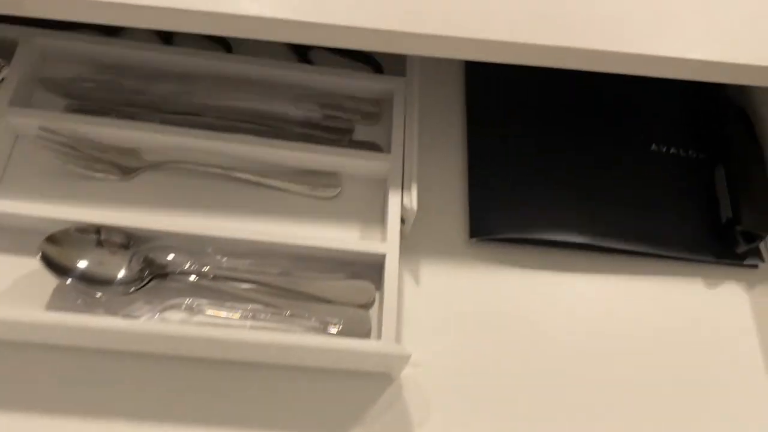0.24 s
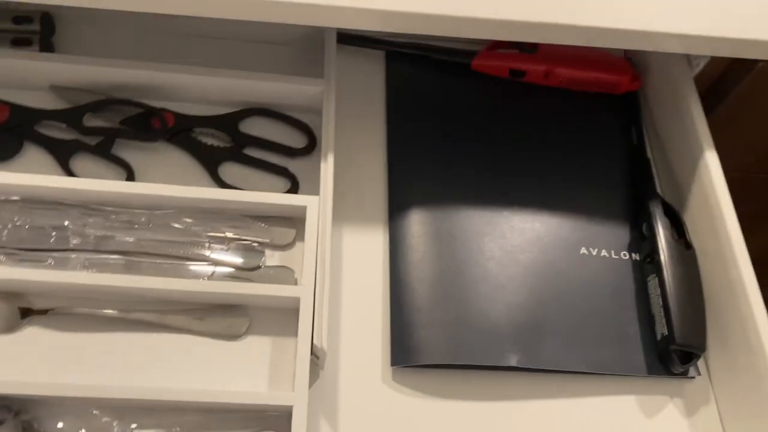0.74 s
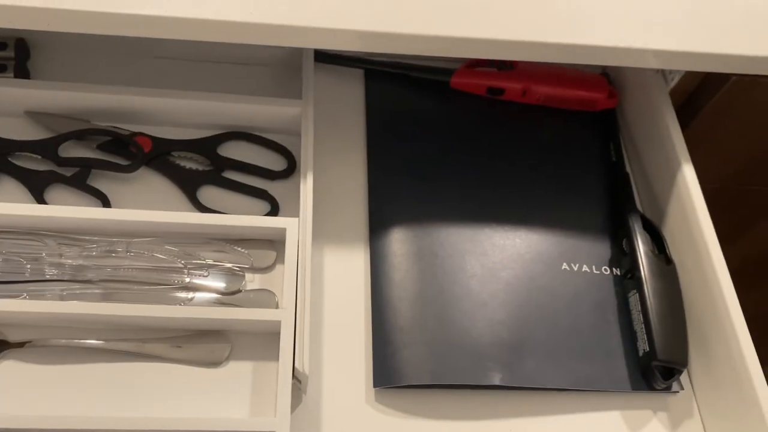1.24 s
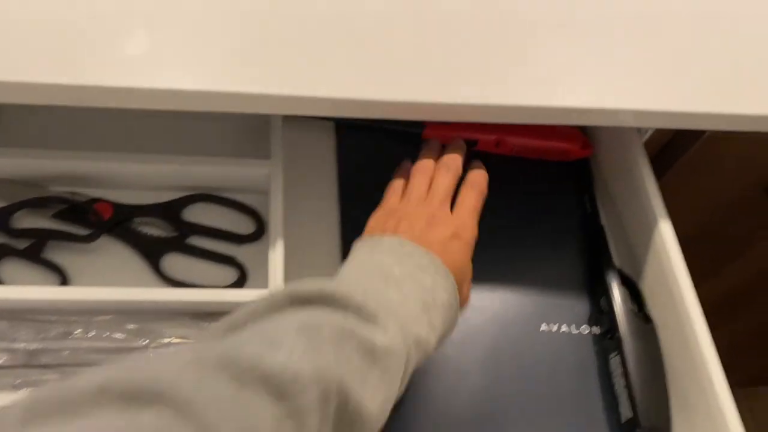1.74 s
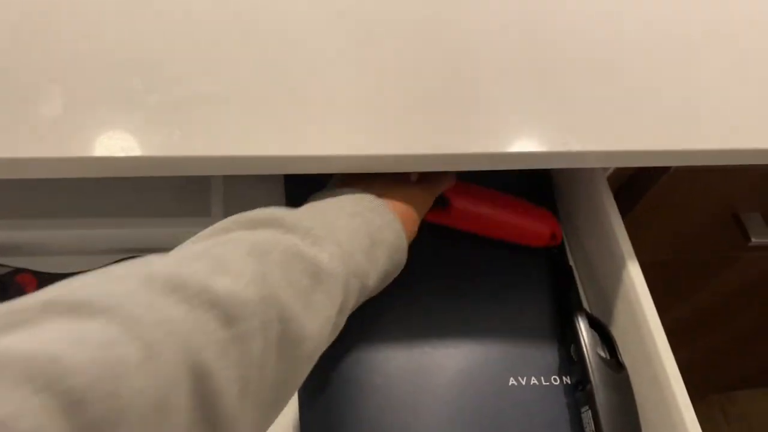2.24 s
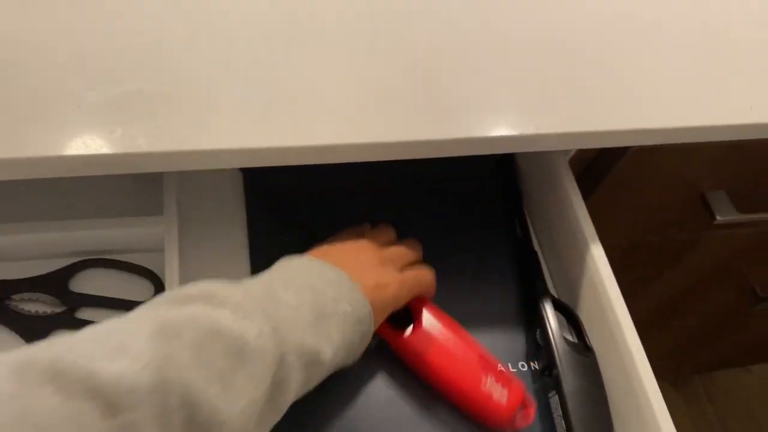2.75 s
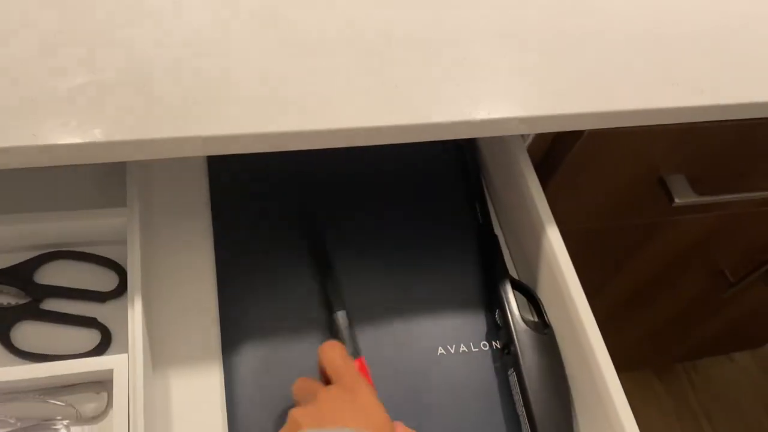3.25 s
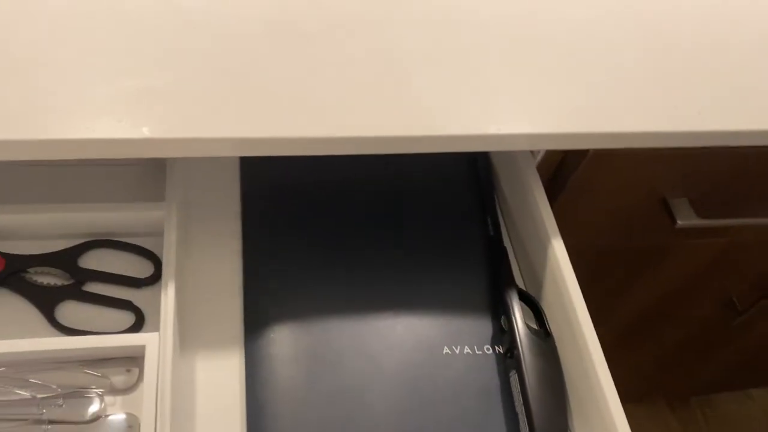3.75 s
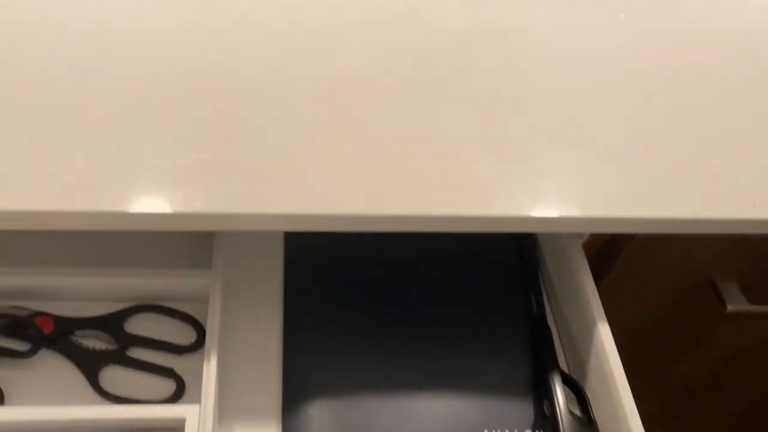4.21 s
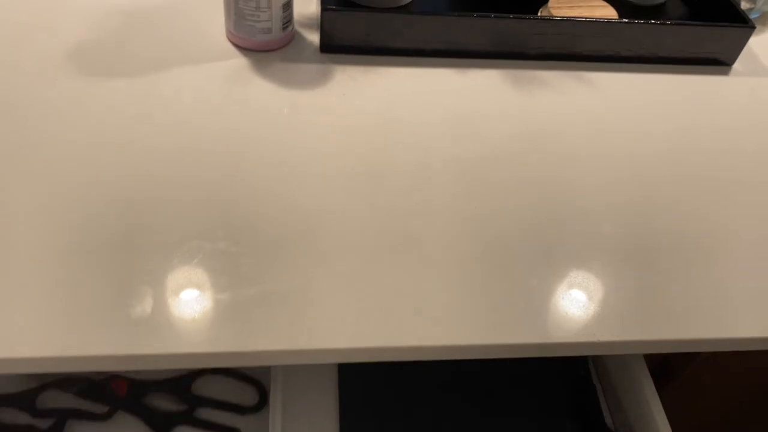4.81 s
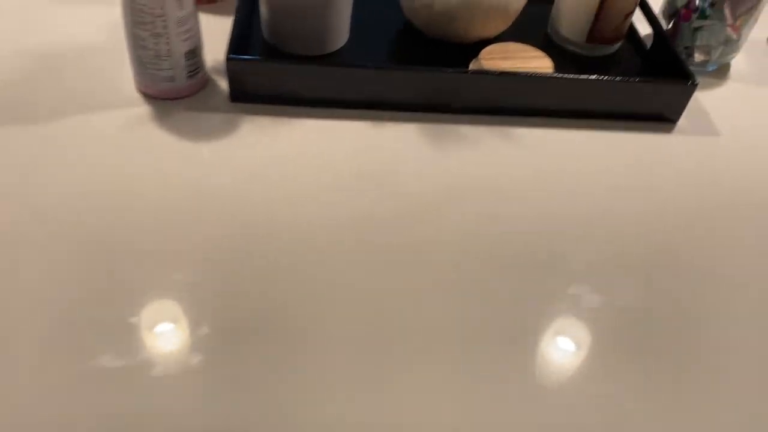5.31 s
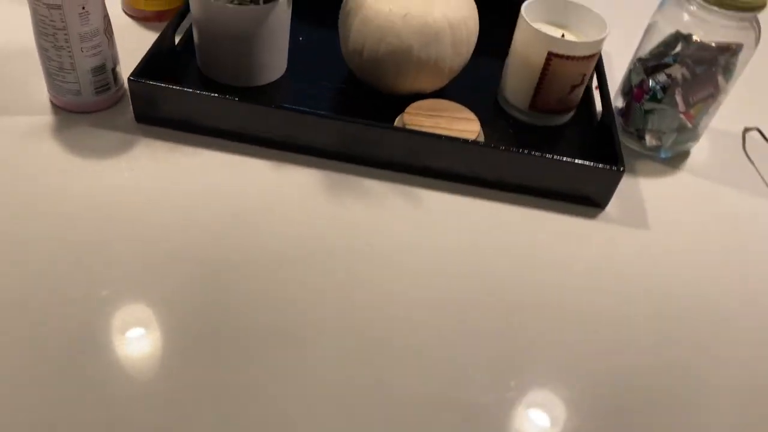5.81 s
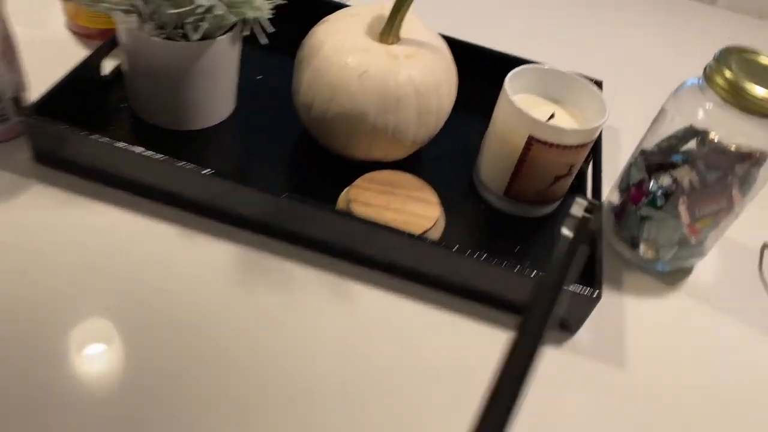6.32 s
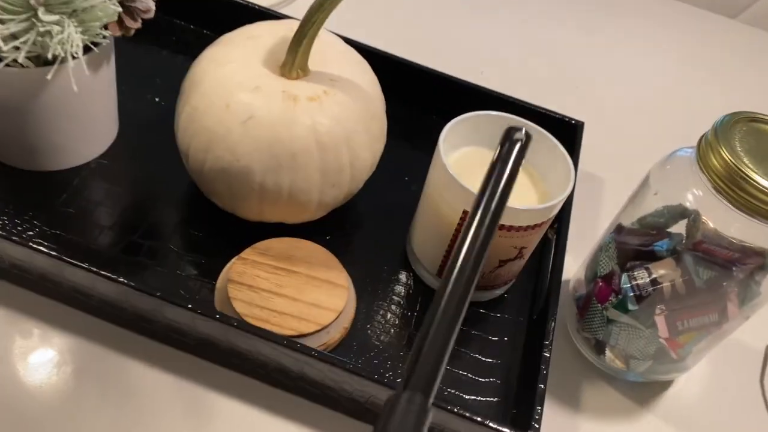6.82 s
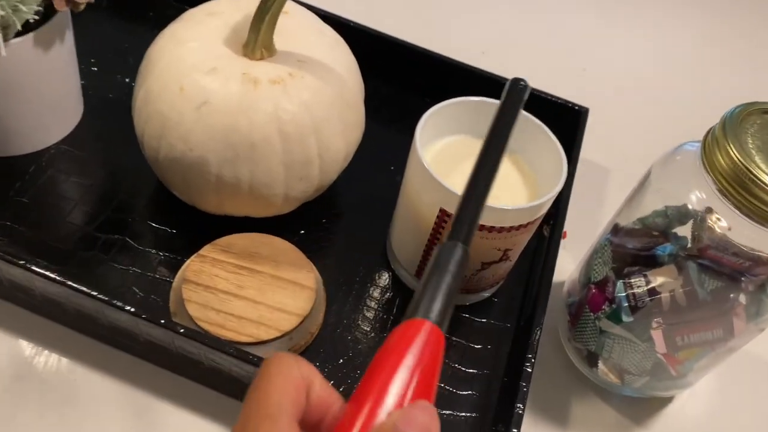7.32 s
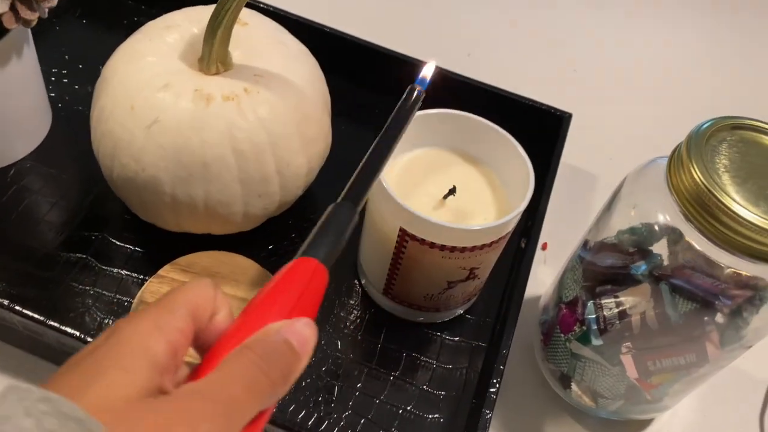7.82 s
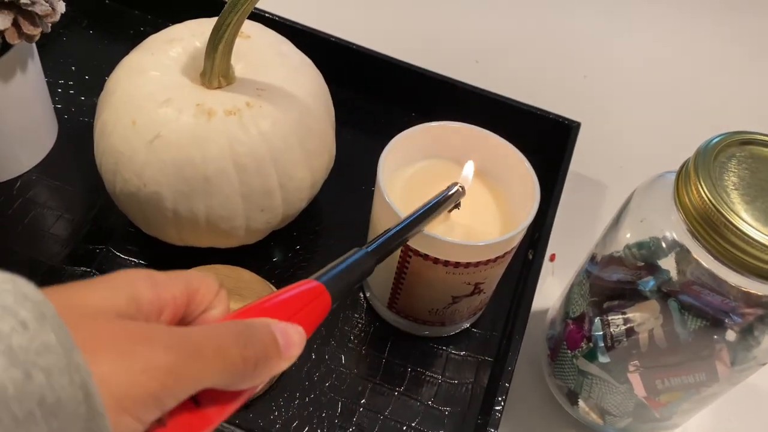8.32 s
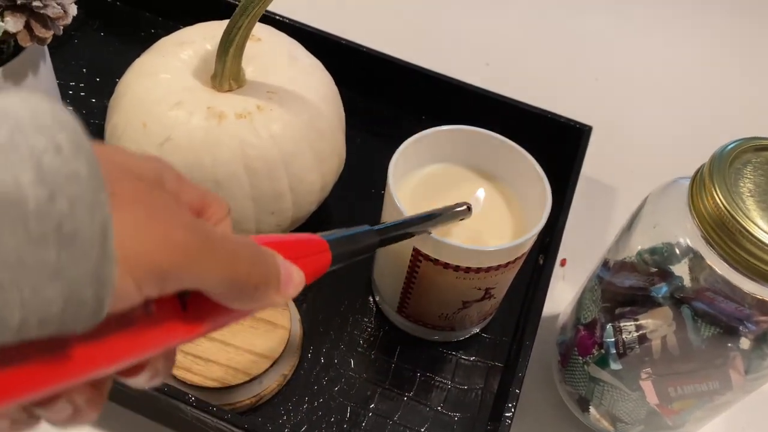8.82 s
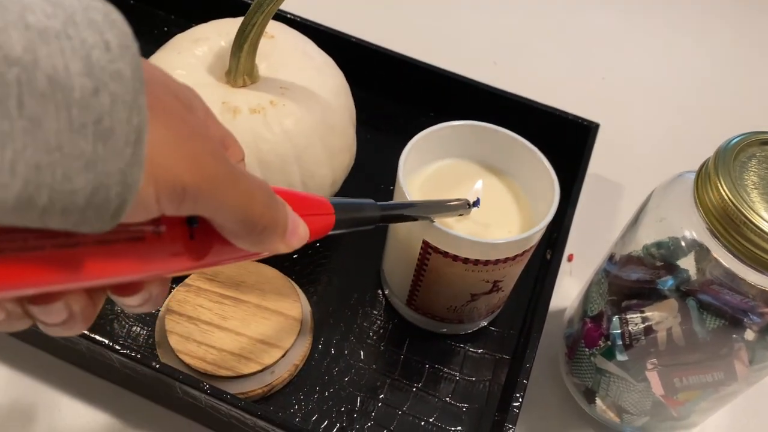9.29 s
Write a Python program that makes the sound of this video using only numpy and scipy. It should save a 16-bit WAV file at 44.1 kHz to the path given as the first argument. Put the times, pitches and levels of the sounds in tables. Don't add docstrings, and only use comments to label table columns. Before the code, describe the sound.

Close, hand-held stereo pickup in a hard-walled kitchen with a short bright echo. At 0 s a drawer is tugged with a thump and rolls out, low rumble and scrape with tiny bright runner clicks. At about 0.65 s it slams into its stop, the loudest moment, with crashing cutlery and a faint metallic ring; small skids settle until 1 s. A quiet gap follows. From 2 to 2.5 s hollow plastic knocks cluster sharply as a lighter is grabbed, then lighter knocks, rubs and rattles until 3.3 s, with small taps near 3.9 s. At 4.6 s bumps and ticks start the drawer rolling in, surging at 5.25 s and shutting with a hard double clack at 5.7 s. Soft settling and handling ticks follow. At 7.62 s the lighter trigger snaps loudly and drily; small release clicks come at 8.0 and 8.3 s, then faint airy rustles and near silence.

```python
import sys
import numpy as np
from scipy import signal
from scipy.fft import rfft, irfft, next_fast_len
from scipy.io import wavfile
from scipy.ndimage import uniform_filter1d

SR = 44100
rng = np.random.default_rng(int(sys.argv[2]) if len(sys.argv) > 2 else 0)


def to_wav(sig):
    pcm = np.clip(np.atleast_2d(sig), -1, 1) * 32767
    pcm = np.round(pcm).astype(np.int16)
    wavfile.write(sys.argv[1], SR, pcm.T)


def attenuation_scalar(level_db):
    decades = np.asarray(level_db, float) / 20
    return 10 ** decades


N = 421155
FFT = next_fast_len(N + SR)
HZ = np.arange(FFT // 2 + 1) * SR / FFT + 1

# frequency in Hz, level in dB per Hz.
AIR = [(15, -41.5), (30, -12.5), (107, -1.5), (250, -12), (950, -30.5), (3000, -35), (8000, -36),
       (15700, -39.5)]
AIR_DB = -67
# frequency in Hz, time to fade by 60 dB in seconds, level in dB.
ROOM = [(60.3, 0.35, -17.5), (250, 0.27, -21.5), (1000, 0.46, -21.5), (3000, 0.52, -25.5), (7000, .5, -27),
        (14054, 0.21, -23)]
NOTES_IN_ROOM = 0.25

# time in seconds, level in dB, resonance in Hz.
CAVITY = [
    [(0.05, -23.5, 280.8), (0.09, -29.5, 279.3), (0.146, -27, 381), (0.18, -31.5, 333.4),
     (0.288, -29.5, 334.6), (0.36, -30.5, 403), (0.504, -33, 337.3), (0.602, -33.5, 425.4),
     (0.62, -32, 424.9)],
    [(4.7, -31, 477.7), (4.896, -29.5, 337), (4.988, -25, 367.7), (5.07, -27.5, 279), (5.172, -29, 333.3),
     (5.284, -19, 268), (5.37, -34.5, 272.1), (5.43, -32, 284.8), (5.68, -34, 261)],
]
CAVITY_WIDTH_HZ, CAVITY_DB = 57, -7

# time in seconds, speed as dB of rumble.
ROLL_OUT = [
    (0.0, -13),
    (0.03, -23),
    (0.19, -29.5),
    (0.32, -30),
    (0.38, -31.5),
    (0.6, -33),
    (0.76, -33),
    (0.9, -43.5),
    (1.1, -51.5),
]
# time in seconds, speed as dB of rumble.
ROLL_IN = [
    (4.6, -53),
    (4.74, -35.5),
    (4.8, -28),
    (5.05, -31.5),
    (5.23, -21),
    (5.32, -27.5),
    (5.62, -33.5),
    (5.8, -35),
    (6.2, -60.5),
]
# boom, scrape and rattle, each in dB relative to the rumble.
OUT_MIX = (-10, 0, -30.5)
# boom, scrape and rattle, each in dB relative to the rumble.
IN_MIX = (-14.5, -7, -24.5)
# boom, rumble, scrape and rattle, each in dB.
REST_DB = (-67, -73.5, -75.5, -79)
# start in seconds, length in seconds, scrape in dB,
# rattle in dB relative to scrape, rumble in dB relative to scrape.
RUBS = [(0.869, 0.044, -20.5, -17, -33), (1.106, 0.45, -59, -8.5, 0.5), (1.557, 0.227, -47, -16.5, -5.5),
        (2.166, 0.22, -44.5, -18, 2), (2.42, 0.38, -45, -8.5, -18.5), (2.847, 0.055, -56, -13, -1.5),
        (3.193, .1, -45.5, -7, -3.5), (3.382, 0.45, -57, -0.5, -3), (4.147, 0.055, -38.5, -8.5, -11.5),
        (4.368, 0.03, -38.5, -14, -7), (5.7, 0.028, -26, -12, -7), (5.894, 0.0393, -32.5, -21.5, -12.5),
        (6.296, 0.04, -57.5, -16, -2), (6.83, 0.071, -51.5, -13, 4.5), (6.99, 0.17, -69, -6, 13),
        (7.422, 0.021, -63, -23, 3.5), (7.622, 0.017, -56, -25, 13.5), (7.744, 0.075, -54.5, 5.5, -25),
        (8.024, 0.031, -71, -11, 6.5), (8.951, 0.029, -77, -4.5, -1), (9.099, 0.031, -74, -4, -9),
        (9.272, 0.035, -75.5, -9, -8.5)]
# start in seconds, length in seconds, level in dB.
SHAKES = [
    (0.0, 0.037, -38),
    (0.78, .06, -34.5),
    (2.28, .03, -48),
    (2.62, 0.13, -34.5),
    (5.16, .08, -40.5),
    (5.28, 0.067, -28),
    (5.78, 0.035, -38),
    (6.5, 0.11, -63),
]
# start in seconds, length in seconds, level in dB.
BOOMS = [(0.0, .04, -28), (0.63, 0.079, -28.5), (1.61, 0.023, -52.5), (1.97, 0.014, -43),
         (2.14, 0.079, -39), (2.36, .03, -32), (3.15, 0.022, -43.5), (3.44, 0.017, -41.5),
         (4.31, 0.22, -39), (5.22, .02, -31), (5.7, 0.017, -27.5), (6.84, 0.4, -62), (7.42, 0.031, -54),
         (7.56, 0.02, -36.5), (7.65, 0.015, -50), (8.04, 0.018, -65.5)]
RUB_RISE_DB_S, RUB_FALL_DB_S = 150.5, 93.5
SHAKE_RISE_DB_S, SHAKE_FALL_DB_S = 129.5, 112
BOOM_RISE_DB_S, BOOM_FALL_DB_S = 249.5, 110.5
BOOM_HZ, BOOM_WIDTH_HZ = 60, 51
# resonance in Hz, width in Hz, level in dB.
PANEL = [(117, 49, 1), (239, 60, 2), (285, 58, -0.5), (381, 78, -3.5), (524, 78, -5.5), (680, 250, -10)]
# resonance in Hz, width in Hz, level in dB.
RUNNER = [(2240, 780, -6), (2680, 200, -6.5), (4350, 200, -12)]
# frequency in Hz, level in dB per Hz.
SCRAPE = [(220, -25), (380, -5), (750, -7.5), (1300, -8), (2200, -17.5), (3200, -25.5), (6000, -72)]
# frequency in Hz, level in dB per Hz.
RATTLE = [(1300, -27.5), (2300, -7), (4000, -4.5), (6500, -9.5), (8500, 0), (10500, -10), (14000, -8.5),
          (15800, -9)]
JUDDER_PER_S, JUDDER_DB = 40, 3

# start in seconds, peak in dB.
PUFFS = [(1.2694, -57), (6.3294, -56), (6.4692, -47.5), (6.8019, -49), (7.0994, -60), (7.3294, -61),
         (7.8394, -45), (8.1873, -51), (8.4682, -56.5), (8.6694, -57), (8.9032, -51), (9.0668, -54),
         (9.2324, -53.5), (9.3994, -59.5)]
# start in seconds, peak in dB.
TICKS = [(0.1233, -21.5), (0.2, -23), (0.2394, -36), (0.2683, -37.5), (0.2984, -34), (0.3669, -35),
         (0.4237, -41), (0.4388, -33), (0.5092, -35.5), (0.5309, -50.5), (0.5882, -47), (2.3022, -26.5),
         (2.3154, -25.5), (4.6311, -28), (4.763, -30.5), (4.8125, -30), (4.9988, -33), (5.2053, -21.5),
         (5.6503, -26), (6.553, -54.5), (6.59, -56), (6.61, -54), (4.8973, -37), (4.9343, -24.5),
         (4.9761, -29), (5.083, -38), (6.6618, -51), (7.4155, -50), (7.4776, -62.5), (8.406, -63)]
# start in seconds, length in seconds,
# level in dB, centre in Hz, width in Hz.
SLIDES = [(0.029, 0.038, -23.5, 8010, 16050), (0.629, 0.022, -12.5, 603.4, 2566),
          (0.6337, 0.0092, -14.5, 3000, 8950), (0.649, .085, -9, 7503, 17050),
          (.652, 0.055, -5.5, 352.1, 689.4), (0.892, .01, -14.5, 601, 808), (0.949, 0.015, -9.5, 692, 1169),
          (2.052, 0.017, -10.5, 1057, 916), (2.326, .005, -21, 2020, 6000),
          (4.687, 0.011, -28.5, 6000, 12000), (2.451, 0.0022, -20.5, 1453, 2390),
          (4.803, 0.02, -32.5, 4360, 6000), (2.527, 0.023, -31, 4480, 7000),
          (3.139, 0.048, -27.5, 1890, 7000), (3.307, 0.02, -43.5, 3000, 7000),
          (4.115, 0.073, -48, 2000, 6145), (5.129, 0.15, -30, 8465, 14980), (5.164, .04, -29, 10930, 11990),
          (5.194, 0.044, -17, 1486, 6150), (5.278, 0.053, -22.5, 1514, 5790),
          (5.551, 0.046, -30, 10960, 15050), (5.652, 0.052, -26, 3000, 7000),
          (5.728, 0.054, -16, 2088, 1970), (6.841, 0.062, -43.5, 910, 2000),
          (7.095, 0.049, -54.5, 910, 1800), (7.199, 0.031, -69.5, 1000, 2210),
          (7.41, 0.047, -55, 900, 1800), (7.554, 0.093, -54.5, 880, 1960)]

# start in seconds, pitch in Hz, level in dB, 60 dB fade in seconds.
HOLLOW = [(0.64, 303, -5, 0.092), (0.63, 125, -6, 0.16), (2.122, 615, -13, 0.12), (2.334, 590, -10, 0.075),
          (2.332, 937, 2, 0.022), (2.823, 567, -43, 0.074), (3.137, 184, -25.5, 0.074),
          (4.582, 800, -17, 0.06), (4.584, 477, -18.5, 0.053), (4.58, 1400, -37, .04),
          (2.284, 4000, -14.5, 0.018), (2.333, 4400, -14, .02), (2.332, 3800, -17.5, 0.023),
          (2.332, 1400, -11, 0.047), (2.2, 1350, -11.5, 0.025), (4.691, 1900, -25.5, 0.032),
          (6.143, 4400, -40, 0.023), (6.174, 4600, -39.5, 0.031), (6.327, 3966, -49, .02),
          (6.7, 4800, -49, 0.018), (4.935, 3800, -25, 0.026), (4.82, 3120, -31, 0.034),
          (3.3, 333, -28.5, 0.043), (3.892, 470, -41, 0.027), (0.22, 4300, -34, 0.037),
          (.283, 4300, -40.5, 0.039), (4.639, 440, -17.5, 0.039), (7.618, 1270, -6, 0.025),
          (7.654, 148, -29, 0.067), (8.004, 1472, -29.5, 0.037)]
CUTLERY_HZ = [1040, 2293, 2385, 2826]
# level in dB, 60 dB fade in seconds.
CUTLERY = [(-43.5, 2.9), (-37, 1.8), (-41.5, 1.7), (-46.5, 0.63)]
STOP_S = 0.66
# start in seconds, peak in dB.
BALLS = [(0.1227, -31.5), (0.18, -45.5), (0.18, -40), (0.1987, -34), (0.2235, -40.5), (0.234, -43),
         (0.2455, -46.5), (0.2683, -42), (0.2984, -42), (0.3351, -50), (0.344, -45.5), (0.3669, -44.5),
         (0.4233, -39), (0.4376, -40), (0.5004, -42.5), (0.5084, -42.5), (0.5084, -41), (0.5302, -46.5),
         (0.5736, -59), (0.5881, -56.5), (0.6081, -36.5)]
BALL_HZ, BALL_T60_S, BALL_DB = 6800, 0.02, -2.5

# start in seconds, level in dB.
LET_GO = [
    (8.003, -22),
    (8.323, -35.5),
]
# pitch in Hz, level in dB.
TRIGGER_MODES = [(700, -18), (1600, -9.5), (2400, -4.5), (3300, -3.5), (3900, -4), (4300, -13), (6930, -12),
                 (10500, -8), (14000, -8)]
RELEASE_T60_S = 0.012
# start in seconds, peak in dB, ring in Hz, crack and thud in dB relative to peak.
TRIGGER_KNOCKS = [(6.325, -45.5, 1900, -10, -18.5), (6.47, -41.5, 949, -6, -21),
                  (6.767, -49, 695, -5, -6.5), (6.839, -34, 1310, -17, -14),
                  (7.193, -28, 777, -12.5, -12.5), (7.2, -30.5, 1664, -16, -17),
                  (7.413, -50, 572, -16.5, 9), (7.55, -50.5, 439, -29.5, 7), (7.622, -2, 1390, -1, -18),
                  (8.002, -27, 2200, -16, -35.5), (8.323, -34.5, 2190, -13.5, -32)]
# start in seconds, peak in dB, ring in Hz, crack and thud in dB relative to peak.
LIGHTER_KNOCKS = [(1.993, -28.5, 1080, -6, -6), (2.044, -6, 1080, -14, -26), (2.094, -12, 1005, -4.5, -15),
                  (2.119, -4, 629, -12.5, -22), (2.253, -13.5, 1098, -11.5, -13),
                  (2.283, -8, 878, -14, -19), (2.333, -2, 646, -14, -17), (2.492, -9, 735, -17, -44),
                  (2.64, -19, 1270, -14.5, -24), (2.82, -16, 547, -13, -28), (2.851, -32.5, 532, -6.5, -21),
                  (3.081, -21, 470, -11, -27), (3.102, -22.5, 980, -15.5, -13.5),
                  (3.135, -12.5, 575, -13.5, -29), (3.165, -21, 2260, -10, -8),
                  (2.315, -20, 1070, -5.5, -23.5), (3.235, -27, 1830, -21.5, -18),
                  (3.277, -21, 1180, -13.5, -23.5), (3.686, -49.5, 729, 4, -14),
                  (3.84, -40.5, 415, -12.5, -13.5), (3.892, -28, 2390, 5, -12.5),
                  (3.929, -46, 2860, -5.5, -21)]
# start in seconds, peak in dB, ring in Hz, crack and thud in dB relative to peak.
DRAWER_KNOCKS = [(0.004, -13, 1048, -12.5, -0.5), (0.032, -13, 415, -3.5, -6),
                 (0.649, 8.5, 825, -11.5, -15), (0.664, 7.5, 867, -2.5, -25),
                 (4.107, -31.5, 629, -24.5, -9.5), (4.575, -26.5, 800, -12.5, -6),
                 (4.385, -24, 2377, -23, -1.5), (4.582, -20.5, 670, -24, -21),
                 (4.639, -16, 463, -27.5, -27), (4.688, -21, 1900, -5.5, -14),
                 (4.708, -19, 593, -20, -12.5), (5.066, -24.5, 785, -18.5, -7.5),
                 (5.269, -14.5, 400.5, -25, -0.5), (5.676, -19.5, 1593, -12, -8.5),
                 (5.708, 2, 2110, -3, -28), (5.724, 3.5, 2066, -8, -28.5), (5.938, -26, 1050, -24.5, -10.5),
                 (6.044, -30.5, 1000, -22, -13), (6.096, -30.5, 1023, -24, -11),
                 (6.143, -34, 679, -4.5, -23), (6.175, -35.5, 1605, -5, -9.5)]

# frequency in Hz, likeness from 0 to 1.
LIKE = [(60, .985), (200, .96), (600, .6), (2000, .3), (5000, .35), (7000, .85), (8000, .995),
        (16000, .995)]
# frequency in Hz, difference in dB.
LEFT_DB = [(60, 0), (250, 1.2), (600, 4), (1200, 2), (3000, 3.3), (6000, 2.5), (7800, 0), (16000, 0)]
# frequency in Hz, level in dB.
MIC = [(30, -4), (80, 2), (6000, -3), (10000, -1.5), (13200, -2), (14500, -0.5), (15500, 1), (16000, -25.5)]
LAG_S, LAG_FROM_HZ, LAG_TO_HZ, LAG_STEPS = 1 / 3700, 6560, 15300, 0.42


def read(table, column=1):
    t = np.array(table, float)
    return np.interp(np.log(HZ), np.log(t[:, 0] + 1), t[:, column])


def shape(x, gain):
    return irfft(rfft(x, FFT) * gain, FFT)[..., :N]


def unit(x):
    return x / np.sqrt(np.mean(x ** 2))


def add(track, s, x):
    i = int(s * SR)
    track[i:i + len(x)] += x[:N - i]


def ring(hz, t60, t):
    return np.sin(2 * np.pi * hz * t) * np.exp(-np.log(1000) * t / t60)


def peak(hz, width):
    return 1 / (1 + 1j * (HZ / hz - hz / HZ) * hz / width)


def resonate(x, hz, width):
    return signal.lfilter(*signal.iirpeak(min(hz, 12e3), hz / width, fs=SR), x)


def grains(rate, spread_db, tail_s):
    luck = np.minimum(rng.exponential(size=N), 4)
    size = (rng.random(N) < rate / SR) * attenuation_scalar(spread_db * luck)
    keep = np.exp(-1 / (max(tail_s, 1e-4) * SR))
    power = signal.lfilter([1], [1, -keep], size ** 2)
    return rng.standard_normal(N) * np.sqrt(power)


def room_air():
    return attenuation_scalar(AIR_DB) * unit(shape(rng.standard_normal((2, N)), attenuation_scalar(read(AIR))))


def kitchen(x):
    t, cycles = np.arange(SR) / SR, np.arange(SR // 2 + 1) + 1
    hz, t60, db = np.transpose(ROOM)
    onset = np.clip((t - 0.004) / 0.015, 0, 1)
    tails = 0
    for f in 45 * 2 ** np.arange(9):
        fade = attenuation_scalar(np.interp(f, hz, db) - 60 * t / np.interp(f, hz, t60)) * onset
        band = np.clip(1 - np.abs(np.log2(cycles / f)), 0, 1) ** 0.5
        tails = tails + rfft(rng.standard_normal((2, SR)) * fade) * band
    echo = irfft(tails, SR)[:, :SR * 3 // 4]
    return shape(x, rfft(echo, FFT) * attenuation_scalar(-12.5))


def cavity():
    t = np.arange(N) / SR
    s, _, hz = np.concatenate(CAVITY).T
    slow = shape(rng.standard_normal((2, N)), 1 / (1 + 2j * HZ / CAVITY_WIDTH_HZ))
    turn = 2 * np.pi * np.cumsum(np.interp(t, s, hz)) / SR
    gain = 0
    for run in CAVITY:
        run_s, run_db, _ = np.transpose(run)
        gain = gain + attenuation_scalar(CAVITY_DB + np.interp(t, run_s, run_db, left=-150, right=-150))
    return gain * unit(slow[0] * np.cos(turn) + slow[1] * np.sin(turn))


def swells(rows, rise_db_s, fall_db_s):
    t = np.arange(0, N, 64) / SR
    power = 0
    for s, length, db in rows:
        rise = rise_db_s * np.maximum(s - t, 0)
        fall = fall_db_s * np.maximum(t - s - length, 0)
        power = power + attenuation_scalar(db - rise - fall) ** 2
    return np.repeat(power, 64)[:N]


def rolling(curve, mix):
    s, db = np.transpose(curve)
    speed = attenuation_scalar(np.interp(np.arange(N) / SR, s, db, left=-150, right=-150))
    boom_db, scrape_db, rattle_db = mix
    return (speed * attenuation_scalar([boom_db, 0, scrape_db, rattle_db])[:, None]) ** 2


def handling():
    def rub(rows):
        return swells(rows, RUB_RISE_DB_S, RUB_FALL_DB_S)

    boom = swells(BOOMS, BOOM_RISE_DB_S, BOOM_FALL_DB_S)
    rumble = rub([(s, length, db + rumble_db) for s, length, db, _, rumble_db in RUBS])
    scrape = rub([(s, length, db) for s, length, db, _, _ in RUBS])
    rattle = rub([(s, length, db + rattle_db) for s, length, db, rattle_db, _ in RUBS])
    shaken = swells(SHAKES, SHAKE_RISE_DB_S, SHAKE_FALL_DB_S)
    return np.array([boom, rumble, scrape, rattle + shaken])


def judder():
    hold = int(SR / JUDDER_PER_S)
    steps = np.repeat(rng.standard_normal(N // 200), hold)[:N]
    return attenuation_scalar(JUDDER_DB * uniform_filter1d(steps, hold // 2))


def motion():
    rest = attenuation_scalar(REST_DB)[:, None] ** 2
    power = handling() + rolling(ROLL_OUT, OUT_MIX) + rolling(ROLL_IN, IN_MIX) + rest
    panels = sum((-1) ** k * attenuation_scalar(db) * peak(f, w) for k, (f, w, db) in enumerate(PANEL))
    runner = 1 + sum(attenuation_scalar(db + 9) * peak(f, w) for f, w, db in RUNNER)
    boom = unit(shape(rng.standard_normal(N), peak(BOOM_HZ, BOOM_WIDTH_HZ) ** 2))
    rumble = unit(shape(grains(550, 4.2, 0.00071), panels))
    scrape = unit(shape(grains(1000, 5.0, 0.00088), attenuation_scalar(read(SCRAPE)) * runner))
    rattle = unit(shape(grains(1800, 3.0, 0.002), attenuation_scalar(read(RATTLE))))
    layers = [boom * attenuation_scalar(-8.5), rumble * attenuation_scalar(-5.0), scrape * judder() * attenuation_scalar(-13.5), rattle * attenuation_scalar(-2.5)]
    return (np.array(layers) * np.sqrt(power)).sum(axis=0)


def ticks(table, t60, shift_db, ping):
    t, out = np.arange(SR // 3) / SR, np.zeros(N)
    for s, db in table:
        add(out, s, attenuation_scalar(db + shift_db - 60 * t / t60) * rng.standard_normal(len(t)))
    return shape(out, (1 + ping * peak(6000, 600)) / (1 + (3300 / HZ) ** 4))


def slides():
    t, out = np.arange(SR // 4) / SR, np.zeros(N)
    skid = unit(grains(1100, 2.8, 0.0025))
    for s, length, db, hz, width_hz in SLIDES:
        gate = np.clip(t / 0.00089, 0, 1) * np.exp(-np.maximum(t - length, 0) / 0.014)
        rough = gate * skid[int(s * SR):][:len(t)]
        add(out, s, attenuation_scalar(db) * resonate(resonate(rough, hz, width_hz), hz, width_hz))
    return out


def notes():
    out, t = np.zeros(N), np.arange(2 * SR) / SR
    short = t[:SR // 3]
    for s, hz, db, t60 in HOLLOW:
        add(out, s, attenuation_scalar(db) * ring(hz, t60, short) * np.minimum(short / 0.0024, 1))
    for hz, (db, t60) in zip(CUTLERY_HZ, CUTLERY):
        add(out, STOP_S, attenuation_scalar(db) * ring(hz, t60, t))
    for s, db in BALLS:
        add(out, s, attenuation_scalar(db + BALL_DB) * ring(BALL_HZ * rng.uniform(1.0, 1.02), BALL_T60_S, t[:SR // 16]))
    return out


def let_go():
    out, t = np.zeros(N), np.arange(SR // 8) / SR
    for s, db in LET_GO:
        for hz, part_db in TRIGGER_MODES:
            add(out, s, attenuation_scalar(db + part_db) * ring(hz * rng.uniform(0.95, 1.02), RELEASE_T60_S, t))
    return out


def clatter(decay_s, size):
    lags = decay_s * SR * np.geomspace(0.03, 0.5, 6) * rng.uniform(0.7, 1.3, 6)
    z = np.exp(-2j * np.pi * np.arange(size // 2 + 1) / size * np.ceil(lags)[:, None])
    all_pass = np.prod((z - 0.6) / (1 - 0.6 * z), axis=0)
    return irfft(all_pass, size) * np.sqrt(decay_s * SR / 2)


def knocks(table, t60, push_s, chatter_s, crack_s, thud_s, broad, note_db):
    t = np.arange(SR // 6) / SR
    rings, cracks, thuds = np.zeros((3, N))
    panel_thud = ring(110, thud_s, t) + 1.4 * ring(228, thud_s, t) + 0.67 * ring(311, thud_s, t)
    for s, db, hz, crack_db, thud_db in table:
        soft = attenuation_scalar(-0.4 * min(crack_db + 10.5, 0))
        chatter = clatter(push_s * soft / 2 + chatter_s * soft ** 0.5, len(t))
        push = np.exp(-((t - 0.0015 * soft) / (0.00004 * soft)) ** 2) / soft
        blow = 0.6 * chatter + 1.656 * push
        body = resonate(resonate(blow, hz, broad * hz), hz, broad * hz)
        body = body + 0.44 * resonate(blow, 2.0 * hz, 1.0 * hz)
        note = resonate(blow, hz, 5 / np.clip(t60, 0.004, 0.3))
        both = body / np.abs(body).max() + attenuation_scalar(note_db) * note / np.abs(note).max()
        add(rings, s - 0.001 * soft, attenuation_scalar(db - 4.0) * both)
        add(cracks, s - 0.001, attenuation_scalar(db + crack_db) * clatter(crack_s, len(t)))
        add(thuds, s, attenuation_scalar(db + thud_db - 9.5) * panel_thud)
    return rings + shape(cracks, 1 / (1 + (2800 / HZ) ** 4)) + thuds


def scene():
    trigger = knocks(TRIGGER_KNOCKS, t60=0.015, push_s=0.0006, chatter_s=0.004, crack_s=0.0023,
                     thud_s=0.035, broad=1.0, note_db=-17.5)
    lighter = knocks(LIGHTER_KNOCKS, t60=0.045, push_s=0.0005, chatter_s=0.003, crack_s=0.0016,
                     thud_s=0.059, broad=2.5, note_db=-15)
    drawer = knocks(DRAWER_KNOCKS, t60=0.04, push_s=0.002, chatter_s=0.004, crack_s=0.002,
                    thud_s=0.14, broad=1.1, note_db=-13)
    near = motion() + drawer + lighter + trigger + slides() + cavity() + let_go()
    near = near + ticks(TICKS, 0.018, -2.5, 0.3) + ticks(PUFFS, 0.29, -7.0, 0.01)
    rings = notes()
    shared, apart = kitchen(near + NOTES_IN_ROOM * rings) + room_air()
    side = shape(apart * attenuation_scalar(4.5), np.sqrt(1 - np.clip(read(LIKE), 0, 1)))
    return near + rings + shared + np.array([side, -side])


def low_pass(x):
    return signal.sosfilt(signal.butter(12, 15830, fs=SR, output="sos"), x)


def record(dry):
    turn = 2 * np.pi * LAG_S * (np.clip(HZ, LAG_FROM_HZ, LAG_TO_HZ) - LAG_FROM_HZ)
    lag = turn - LAG_STEPS * np.sin(2 * turn)
    half = attenuation_scalar(read(LEFT_DB) / 2) * np.exp(0.5j * (0.016 * HZ / (HZ + 400) - lag))
    heard = shape(dry, attenuation_scalar(read(MIC)) * np.array([half, 1 / half]))
    limited = np.tanh(1.328 * heard) / 0.84
    return low_pass(limited)


dry = scene()
out = record(dry)
to_wav(out)
```